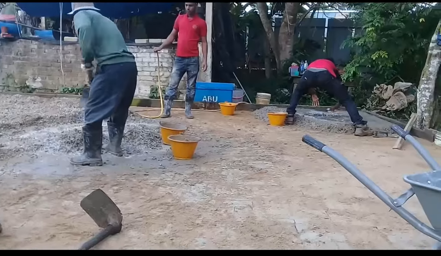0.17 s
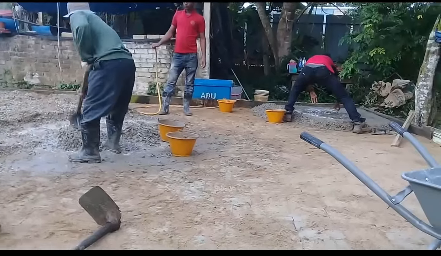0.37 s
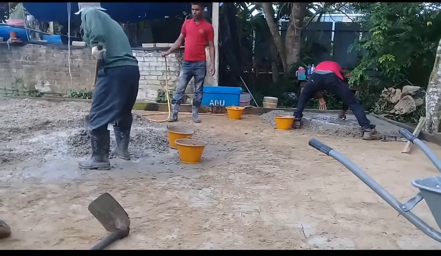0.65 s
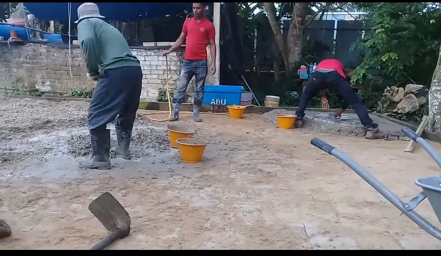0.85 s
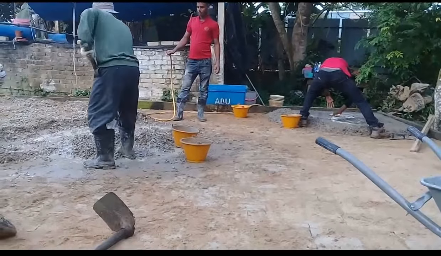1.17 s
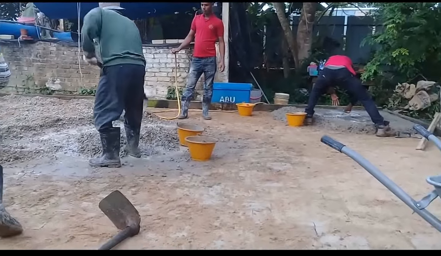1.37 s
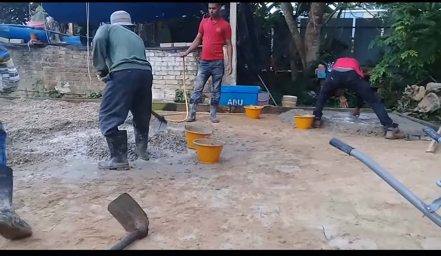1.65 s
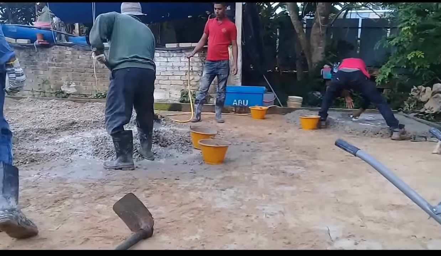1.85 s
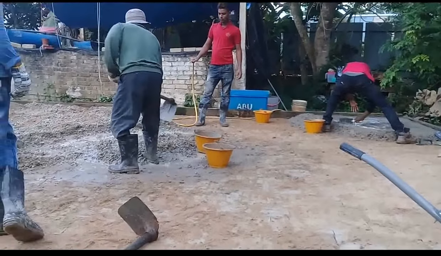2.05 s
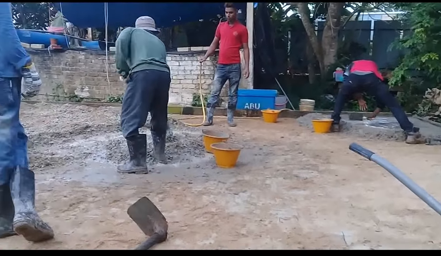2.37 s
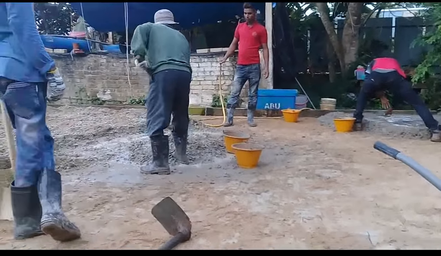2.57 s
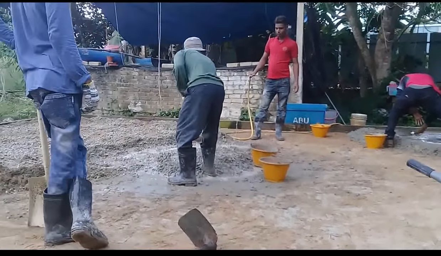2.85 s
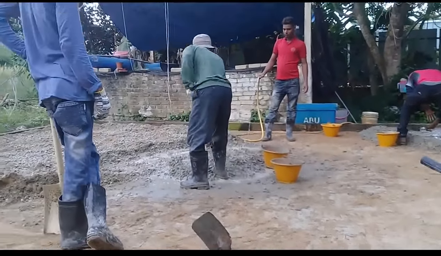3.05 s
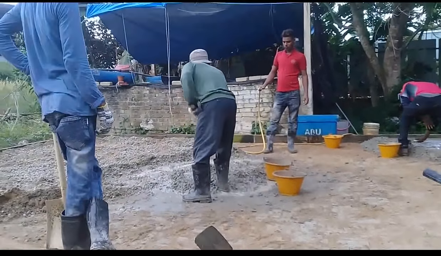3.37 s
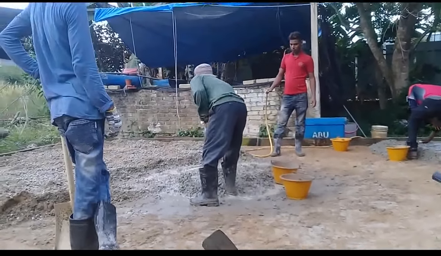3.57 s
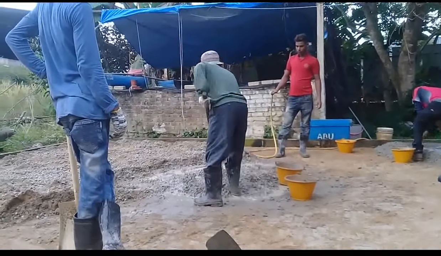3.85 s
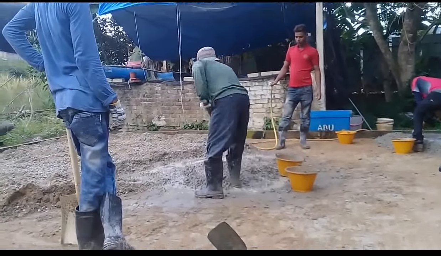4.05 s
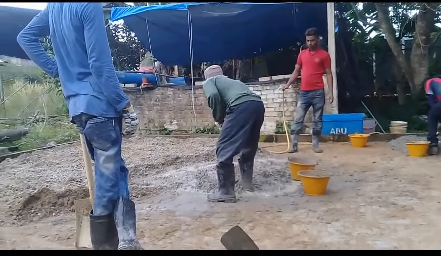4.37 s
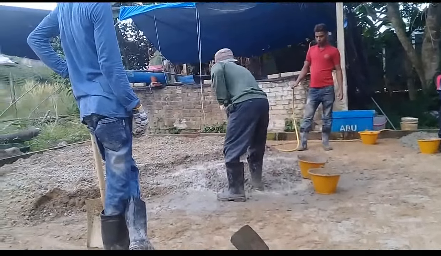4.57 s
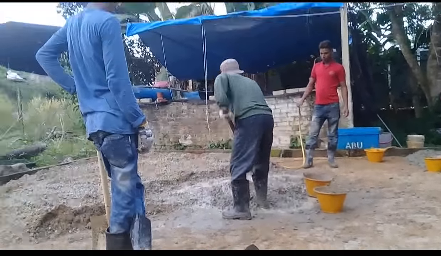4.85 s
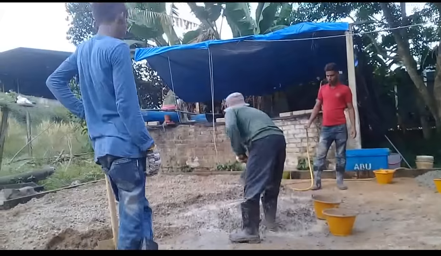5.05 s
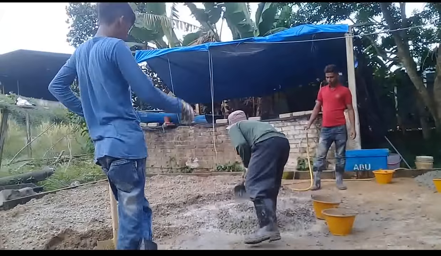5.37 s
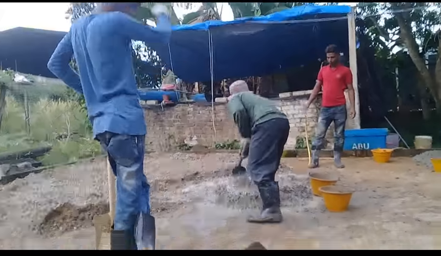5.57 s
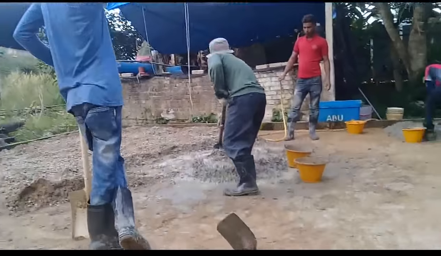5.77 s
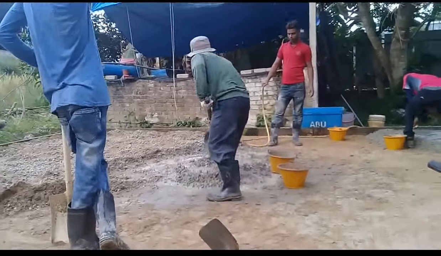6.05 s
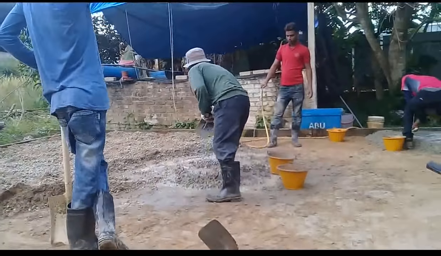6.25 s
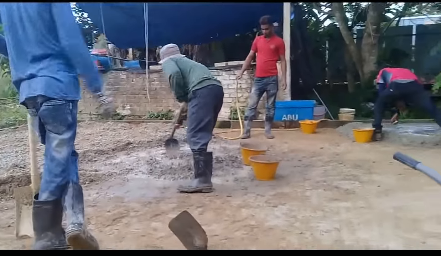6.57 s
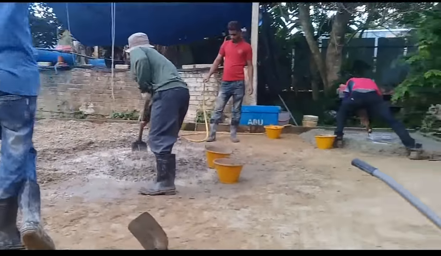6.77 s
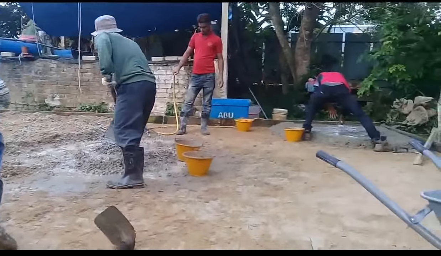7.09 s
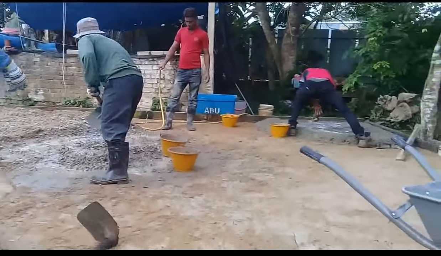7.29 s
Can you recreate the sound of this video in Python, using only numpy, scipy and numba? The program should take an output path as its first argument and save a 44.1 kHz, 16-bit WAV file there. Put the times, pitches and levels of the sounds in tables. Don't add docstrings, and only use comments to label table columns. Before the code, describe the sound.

After a brief silent start, a steel shovel stabs a heap of wet gravel and cement about every two thirds of a second, each bite cracking stones and then grinding. A further blade scrapes and squeals on the slab. Pebbles and grit knock between strokes. Distant engines rumble beyond a walled yard; a phone a few metres away gives a slightly dull top.

```python
import sys
import numpy as np
from scipy import signal
from scipy.fft import rfft, irfft
from scipy.io import wavfile
from scipy.ndimage import uniform_filter1d
from numba import njit

SR = 44100
rng = np.random.default_rng(int(sys.argv[2]) if len(sys.argv) > 2 else 0)


def gain_from_db(level_db):
    decades = np.asarray(level_db, float) / 20
    return 10 ** decades


def generate_wav(signal):
    frames = np.transpose(np.atleast_2d(signal))
    scaled = np.clip(frames, -1, 1) * 32767
    pcm = np.round(scaled).astype(np.int16)
    wavfile.write(sys.argv[1], SR, pcm)


N = 327222
T = np.arange(N) / SR
HZ = np.fft.rfftfreq(N, 1 / SR) + 1e-9


def unit(x):
    return x / np.sqrt(np.mean(x ** 2))


def colour(x, points):
    hz, db = np.transpose(points)
    return irfft(rfft(x) * gain_from_db(np.interp(np.log(HZ), np.log(hz), db)), N)


def band(x, hz, width):
    return signal.lfilter(*signal.iirpeak(hz, hz / width, SR), x)


def walk(rate):
    k = int(SR / rate)
    held = np.repeat(rng.standard_normal(N // k + 1), k)
    return uniform_filter1d(uniform_filter1d(held, k), k)[:N]


def move(t, s, db, rise, hold, fall_db):
    up = np.clip((t - s) / rise, 0, 1)
    return up * up * (3 - 2 * up) * gain_from_db(db - fall_db * np.clip(t - s - rise - hold, 0, None))


@njit
def rings(count, start, hz, t60, size, rate):
    out = np.zeros(count)
    for k in range(len(start)):
        turn = np.exp((2j * np.pi * hz[k] - 6.9 / t60[k]) / rate)
        z = size[k] + 0j
        for i in range(start[k], min(count, start[k] + int(.83 * t60[k] * rate))):
            out[i] += z.imag
            z *= turn
    return out


def ring(s, hz, t60, size):
    s, hz, t60, size = (np.ascontiguousarray(v, float) for v in np.broadcast_arrays(s, hz, t60, size))
    return rings(N, (s * SR).astype(np.int64), hz, np.clip(t60, .003, .5), size, 1. * SR)


def strike(s, hz, t60, size):
    return ring(s, hz, t60, size) - ring(s, hz, .006, size)


def knock(rows, t60_s):
    s, db, hz = np.transpose(rows)
    off = rng.standard_normal((2, len(s)))
    t60 = t60_s * (1500 / hz) ** .6
    first = strike(s, hz, t60, gain_from_db(db - 12.5))
    second = strike(s + 0.0032, hz * (1 + 0.099 * off[0]), 0.5 * t60, gain_from_db(db - 18.5))
    tick = sum(ring(s, tick_hz * (1 + 0.19 * off[1]), 0.0067, gain_from_db(db - 31.0))
               for tick_hz in (2400, 4200, 6600))
    return first + second + tick


# frequency in Hz, level in dB per Hz.
YARD_AIR = [(12, -35.5), (20, 3), (82, 10.5), (108, 8.5), (431, -4.5), (662, -13), (769, -2), (1370, -13.5),
            (1680, 1.5), (2160, -23), (2920, -19.5), (4260, -25.5), (5480, -13.5), (7600, -20), (8200, -27),
            (10700, -64), (18000, -120)]
# time in seconds, level in dB.
TRAFFIC = [
    (1.1, -54.5),
    (4.5, -53),
    (6, -52),
    (7.42, -54),
]
# time in seconds, level in dB.
IDLE = [
    (.25, -69),
    (.4, -50),
    (.62, -46),
    (.7, -50.5),
    (.85, -47.5),
    (1.08, -51.5),
    (1.2, -76),
]


def yard():
    rumble = unit(colour(rng.standard_normal(N), YARD_AIR)) * gain_from_db(-51 + 1.5 * walk(3))
    traffic = unit(band(band(rng.standard_normal(N), 95, 83), 50, 110))
    traffic *= gain_from_db(np.interp(T, *np.transpose(TRAFFIC), -60) - 0.5)
    turn = 2 * np.pi * np.cumsum(76 + 1.5 * walk(4)) / SR
    hum = np.sin(turn) + .5 * np.sin(2 * turn)
    hum *= gain_from_db(np.interp(T, *np.transpose(IDLE)) + 1.7 * walk(10.0))
    return rumble + traffic + hum


# start in seconds, level in dB, hold in seconds, fall in dB per second, note in Hz.
SQUEALS = [
    (0.261, -58, 0.19, 203, 1145),
    (1.962, -45, 0.12, 255, 1535),
    (2.118, -43.5, 0.37, 248, 1481),
    (3.321, -40.5, 0.031, 200, 1506),
    (3.512, -64, 0.064, 249, 1690),
    (4.1915, -35, .009, 2500, 1590),
    (2.87, -55, 0.06, 301, 1494),
    (4.219, -45, 0.2, 243, 1625),
    (4.683, -33, 0.0081, 1497, 1670),
    (5.093, -50, 0.1, 302, 1493),
]


def slab(loose):
    out = np.zeros(N)
    chatter_hz, glide_hz_s = 900, 600
    chatter = band(loose, chatter_hz, 170)
    jerk = gain_from_db(2.5 * walk(150))
    for s, db, hold, fall_db, hz in SQUEALS:
        turn = 2 * np.pi * np.cumsum(hz + glide_hz_s * np.clip(T - s, 0, .3)) / SR
        shifted = chatter * np.cos(turn - 2 * np.pi * chatter_hz * T)
        clean_db = -7 + 13 * (hold < .02)
        note = unit(band(shifted, hz, 450)) + gain_from_db(clean_db) * np.sin(turn)
        out += note * jerk * move(T, s, db, .003, hold, fall_db)
    return out


# start in seconds, peak in dB, pitch in Hz.
LANDINGS = [
    (0.26, -38.5, 318),
    (0.476, -24, 386),
    (1.111, -39, 304),
    (2.459, -25.5, 252),
    (3.042, -36, 189),
    (5.486, -40, 187),
]


def landings():
    s, db, hz = np.transpose(LANDINGS)
    return ring(s, hz, 0.12, gain_from_db(db - 5.5)) + ring(s + 0.006, 2.1 * hz, 0.061, gain_from_db(db - 8.0))


# start in seconds, peak in dB, pitch in Hz.
GRIT = [(1.8138, -18, 6350), (1.9244, -27.5, 6380), (2.0907, -23.5, 6730), (2.124, -28, 6700),
        (2.2199, -29, 6850), (2.2852, -33, 6650), (2.8345, -25, 7630), (2.9588, -34, 6200),
        (3.3376, -25, 6200), (3.345, -24, 6000), (3.3586, -25, 5950), (4.0208, -26.5, 4950),
        (4.059, -26, 5600), (4.133, -32, 5160), (4.1912, -20.5, 5780), (4.802, -29, 5850),
        (5.0025, -22, 6170), (5.5334, -18, 5500), (6.2756, -25, 6170), (7.0234, -25, 7850),
        (7.4114, -18.5, 5200), (7.412, -19, 7700), (7.4125, -21, 1924)]


def clinks():
    s, db, hz = np.transpose(GRIT)
    out = ring(s, hz, .016, gain_from_db(db - 5))
    for lag, shift in ((.002, .93), (.005, 1.06), (.012, .97)):
        out += ring(s + lag, shift * hz, .016, gain_from_db(db - 12 - 500 * lag))
    return out


# start in seconds, peak in dB, pitch in Hz.
PEBBLES = [(0.26, -30.5, 525), (0.808, -16, 1290), (1.256, -8.5, 1720), (1.449, -10, 1290),
           (1.821, -6, 1500), (1.952, -22, 1690), (2.018, -4, 1680), (2.052, -6, 1150), (2.091, -21, 1240),
           (2.142, -9, 1680), (2.223, -14, 1200), (2.249, -11, 1590), (2.312, -12, 1500),
           (2.737, -22, 1650), (3.102, -6.5, 810), (3.967, -14, 1260), (4.454, -9, 1220),
           (4.885, -12, 2480), (5.799, -15, 710), (5.845, -0.5, 3950), (6.363, -25, 5330),
           (6.469, -22, 830), (6.811, -19, 650), (6.889, -12.5, 760), (7.024, -20, 1730)]


def pebbles():
    return knock(PEBBLES, .018)


# start in seconds, peak in
# dB, pitch in Hz.
SNAPS = [(1.0625, -28, 4430), (1.0804, -26, 4340), (1.4513, -25.5, 4350), (1.5, -35, 5460),
         (1.603, -39, 4500), (1.629, -34, 4200), (1.7049, -14, 4290), (2.0902, -45, 6850),
         (2.2195, -39, 6800), (2.2314, -36, 6470), (2.2852, -43, 6610), (2.3489, -14, 3810),
         (2.834, -39, 4300), (2.9585, -29, 6100), (2.9851, -31, 4470), (3.6486, -18, 3880),
         (4.0202, -37, 4300), (4.0512, -34, 4830), (4.0592, -37, 5680), (4.076, -35, 5530),
         (4.133, -37, 5170), (4.3829, -19, 4030), (4.4544, -25, 4000), (4.8017, -24, 4230),
         (6.277, -29, 4330), (6.364, -33, 5170), (6.4074, -37, 5670), (6.551, -25, 4730),
         (6.671, -29.5, 4050),
         (1.9512, -32, 1710), (1.9743, -30, 1390), (1.9944, -28, 1180), (2.0086, -29, 1630),
         (2.0168, -24, 1700), (2.0204, -38, 1380), (2.034, -32, 2460), (2.0489, -32, 1530),
         (2.0522, -23, 1400), (2.057, -24, 1530), (2.074, -38, 1770), (2.0911, -35, 2140),
         (2.106, -25, 1680), (2.1227, -27, 1630), (2.139, -38, 1510), (2.152, -25, 1250),
         (2.161, -34, 1380), (2.1707, -24, 1560), (2.2223, -27, 1500), (2.249, -30, 1490),
         (2.3124, -31, 1490), (2.347, -20, 2080), (2.0190, -30.5, 1300), (2.9605, -19, 1470),
         (4.193, -33, 1570), (6.2772, -35, 2450), (6.467, -40, 1960)]


def snaps():
    s, db, hz = np.transpose(SNAPS)
    dull = hz < 2800
    t60 = .006 * np.where(dull, 2.2, 1)
    spread = np.where(dull, .6, .75)
    size = gain_from_db(db - 6)
    out = np.zeros(N)
    for share in (.6, .82, 1, 1.25):
        note_hz = share ** spread * hz
        out += ring(s, np.minimum(note_hz, 7800), t60, size) - ring(s, note_hz, .003, size * dull)
    return out


# start in seconds, peak in dB,
# pitch in Hz.
JAMS = [(0.494, -16, 1990), (0.595, -19.5, 1200), (0.693, -24, 1710), (1.11, -19, 980),
        (1.117, -18, 1410), (1.439, -20.5, 1270), (1.731, -12.5, 1420), (1.74, -20, 1350),
        (1.764, -23.5, 2080), (3.005, -21, 2110), (3.022, -20, 2170), (3.117, -24, 814),
        (3.165, -31, 1120), (3.698, -27, 1320), (3.72, -21.5, 1200), (3.8, -17.5, 770),
        (4.294, -27, 1690), (4.352, -23.5, 1620), (4.635, -25.5, 750), (4.72, -26, 1600),
        (5.396, -29, 2110), (5.502, -18, 1180), (5.544, -16, 2160), (5.574, -23, 2010),
        (5.598, -16.5, 1150), (5.687, -22.5, 633), (5.88, -22, 1640), (3.785, -22, 781),
        (5.015, -22, 1700), (6.469, -45, 1970), (6.859, -43, 2260),
        (0.4705, -11.5, 3890), (0.5936, -26, 4200), (0.7682, -27, 6120), (0.9383, -38, 4200),
             (1.1029, -15, 4360), (1.4507, -25, 4250), (1.4994, -37, 3630), (1.602, -37, 4290),
             (1.9694, -31, 3880), (2.678, -30, 4130), (3.021, -13.5, 4500), (3.103, -22, 4200),
             (3.7094, -18, 3900), (3.812, -28, 4060), (3.79, -25, 4060), (3.9439, -32, 4040),
             (3.967, -22.5, 4280), (4.0204, -28, 4260), (4.455, -21, 4000), (4.5076, -19, 3940),
             (4.6493, -28, 4220), (4.6818, -29, 4040), (4.7427, -25.5, 4170), (4.7707, -26, 3980),
             (5.3158, -31, 6030), (5.325, -29, 6050), (5.665, -23, 4400), (5.941, -30, 4200),
             (6.024, -29, 4100), (5.398, -18, 3860), (5.4914, -19.5, 4290), (5.5009, -24, 3870),
             (5.5674, -15.5, 3720), (5.7993, -20, 4000), (6.2763, -24.5, 4500), (6.5564, -14, 6380),
             (6.6018, -15, 4340), (6.626, -18, 4020), (6.671, -31, 3910), (6.758, -22, 4060),
             (6.8122, -17.5, 4060), (6.8894, -22, 4080)]


def jams(count=4):
    s, db, hz = np.transpose(JAMS)[:, :, None]
    lag, off, hard = rng.random((3, len(s), count))
    lasts_s, pitch_spread = 0.0087, .09
    when = s + lasts_s * lag * np.arange(count) / count
    pitch = hz * (1 + pitch_spread * (2 * off - 1))
    t60 = .026 * (1500 / hz) ** 0.21
    notes = np.broadcast_arrays(when, pitch, t60, gain_from_db(db - 9 - 4 * hard))
    return ring(*(np.ravel(v) for v in notes))


# frequency in Hz, level in dB, t60 in seconds.
LOADED = [(710, -11, 0.059), (2080, -18.5, 0.099), (3950, -0.5, 0.05), (4800, -8.5, 0.046)]
# start in seconds, level in dB, extra treble in dB.
BITES = [
    (0.4681, -21, -2),
    (.475, -16.5, -2),
    (1.0625, -32, 4),
    (1.728, -16.5, -4),
    (2.348, -23, 4),
    (2.9855, -9, -22),
    (2.994, -32.5, 7),
    (3.6485, -15.5, -4),
    (3.6585, -30.5, 8),
    (4.384, -36, 13),
]


def bites():
    hz, mode_db, t60 = np.transpose(LOADED)
    out = np.zeros(N)
    for s, db, treble_db in BITES:
        off = 1 + .025 * rng.standard_normal(len(hz))
        out += ring(s, hz * off, t60, gain_from_db(db + mode_db + treble_db * (hz > 3000)))
    return out


# start in seconds, peak in dB, pitch in Hz.
NOTES = [
    (1.101, -7, 950),
    (1.704, 8, 4290),
    (2.349, 0.5, 2180),
    (2.859, -15.5, 4230),
    (2.959, -9, 1447),
    (2.985, -1.5, 2180),
    (5.012, -14, 2360),
    (5.037, -17, 2420),
    (5.533, -8.5, 2240),
    (5.599, -7, 4070),
]


def blade_notes():
    return knock(NOTES, .05)


# start in seconds, level in dB, then its modes,
# each a frequency in Hz, level in dB and t60 in seconds.
CLANGS = [
    (1.7045, -23.5, [(710, -17, 0.095), (1400, -13, .1), (2045, 7.5, 0.053), (4100, -6, .08), (5390, 4, 0.051), (7550, -10, 0.083)]),
    (2.834, -41, [(2380, 5, 0.044), (5310, 13, 0.065), (6140, 4, .06), (7900, 6, 0.055)]),
    (4.191, -31.5, [(1660, -2, .12), (2380, -10, .1)]),
    (4.383, -20.5, [(2090, -4, 0.035), (3340, -4, 0.024), (3990, -3, 0.031), (5270, -10.5, .03)]),
    (5.3927, -24, [(1280, -9, 0.018), (2131, 0.5, 0.34), (2230, -13, .12), (760, 5, 0.028), (2550, -5, 0.07), (3946, 7, 0.04), (3698, -10, 0.15), (4264, -6, 0.22), (4479, -5, 0.07), (6885, -17, .14), (5450, -18.5, .2), (6150, -14, 0.28), (6700, -16.5, 0.2)]),
    (2.9585, -37, [(6200, 4, .03), (7400, -3, .03), (4100, -8, .08)]),
    (2.985, -22, [(5350, 6, .035), (3060, -1, .05), (4600, -4.5, 0.05), (2070, -10, .09), (1630, -3, .08)]),
    (6.275, -36, [(2470, -1, 0.051), (4320, 4, 0.037), (1650, 0, 0.062), (7700, -1, .04)]),
    (6.550, -13, [(155, 2, 0.03), (318, -5, 0.043), (640, 1, 0.036), (2120, -18, 0.12), (3090, -7.5, 0.11), (4660, -0.5, 0.026), (3900, -3, 0.04), (520, -2.5, 0.069), (5340, -9.5, 0.11), (6380, -10, 0.1), (7580, -3, 0.038)]),
]
THUD = -36, 170, .04


def clangs():
    free = np.zeros(N)
    for s, level_db, modes in CLANGS:
        hz, db, t60 = np.transpose(modes)
        free += strike(s, hz, np.minimum(t60, .3), gain_from_db(level_db + db))
    db, hz, t60 = THUD
    age = np.clip(T - CLANGS[-1][0], 0, None)
    slap = unit(band(band(rng.standard_normal(N), hz, 100), hz, 200))
    slap *= gain_from_db(db - 60 * age / t60) * (1 - np.exp(-age / 0.003))
    rattle = .5 * np.roll(free, 37) - .4 * np.roll(free, 101)
    return free + rattle + slap


# frequency in Hz, width in Hz, level in dB.
BLADE = [(656, 170, -4.5), (2060, 530, 6.5), (4290, 690, 0.5), (5170, 74, -15.5), (6380, 23, -28.5),
         (7260, 150, -11)]
# frequency in Hz, level in dB per Hz.
GRAVEL = [(120, -10.5), (200, -8.5), (319, -4.5), (470, -12.5), (662, -5.5), (946, -2), (1040, -5.5),
          (1230, 1.5), (1870, -3), (2160, -6), (2810, -9), (4200, 2.5), (4990, -2.5), (7710, 0.5),
          (8200, 1), (10700, -59.5), (18000, -120)]


def stones(count=60000):
    when, pitch, hard, damp = rng.random((4, count))
    size = gain_from_db(np.minimum(-3.5 * np.log(1 - hard), 18))
    clicks = np.bincount((when * N).astype(int), size * np.sign(damp - .5), N)
    pings = ring(when * N / SR, 200 + 8000 * pitch, 0.048 + 0.078 * damp, size)
    drive = unit(clicks) + 0.95 * rng.standard_normal(N)
    steel = sum(gain_from_db(db) * band(drive, hz, 1.4 * width) / np.sqrt(width) for hz, width, db in BLADE)
    loose = colour(unit(drive) + gain_from_db(-2.5) * unit(pings), GRAVEL)
    return loose, steel


EDGES_HZ = 1000, 2800, 5300


def split(x):
    below = [0] + [1 / (1 + (HZ / edge) ** 8) for edge in EDGES_HZ] + [1]
    return [unit(irfft(rfft(x) * np.sqrt(b - a), N)) for a, b in zip(below, below[1:])]


STAB_S = 1.062, 1.7035, 2.347, 2.9845, 3.6475, 5.392, 5.528, 6.548, 7.409
# level in dB, hold in seconds, fall in dB per second, weight of wet mix in dB.
PLUNGES = [
    (-33, 0.082, 138, 3),
    (-22, 0.0026, 92, -6.5),
    (-30, 0.004, 71.5, -1.5),
    (-30, 0.025, 93, -2.5),
    (-31.5, 0.0062, 88, -3.5),
    (-30, 0.0021, 280, -5.5),
    (-35.5, 0.12, 45, -2),
    (-27, 0.0071, 930, -6.5),
    (-42, .02, 100, -8.5),
]
# start in seconds, level in dB, hold in seconds, fall in dB per second, weight in dB.
DRAGS = [(0.454, -27, 0.0029, 120, -2), (0.569, -40, 0.0072, 108, 0.5), (1.09, -42.5, .03, 120, 3),
         (1.18, -46, 0.039, 108, -1), (1.3, -52.5, 0.1, 59.7, -1), (1.48, -61, 0.058, 50, 5),
         (2.44, -61, 0.039, 90, 8), (2.58, -55, 0.16, 50.4, -5.5), (3.076, -40.5, 0.0056, 130, -1),
         (3.7, -40, 0.12, 60, -2), (3.97, -59, 0.027, 80, -14), (4.437, -36.5, 0.12, 168, -0.5),
         (4.63, -42, 0.052, 61.5, 0), (5.467, -37, 0.014, 150, 0), (5.768, -40.5, 0.1, 101.4, -1),
         (5.86, -44, 0.094, 72, -3.5), (6.0, -47.5, 0.042, 110, -7.5), (6.55, -41, 0.15, 60, -4),
         (6.781, -38.5, 0.098, 69.3, -2), (6.96, -44, 0.039, 300, -5), (7.03, -53.5, 0.075, 40, -6)]
# start in seconds, level in dB, hold in seconds, fall in dB per second, brightness in dB.
FAR = [(.24, -50, 0.14, 80, -9.5), (.67, -39.5, 0.075, 79.6, 3.5), (.78, -38.5, 0.17, 40, 4),
       (1.36, -43.5, 0.035, 60, -1.5), (1.415, -43, 0.017, 100, 5), (1.86, -36, 0.15, 60, 3),
       (2.1, -47.5, 0.14, 90, 5), (2.55, -45, 0.26, 70, -3), (3.18, -42, 0.14, 60, 3.5),
       (3.31, -40.5, .05, 90, -3.5), (3.5, -42, 0.24, 60, -2), (3.878, -34, 0.082, 80, -12),
       (5.148, -44, 0.02, 60, 7.5), (5.28, -44, .08, 80, -4.5), (6.39, -50.5, 0.058, 90, 8)]
SKID_S = 2.833, 2.958, 3.335, 4.191, 4.29, 4.382, 4.8, 4.884, 5.001, 5.31, 6.274
# level in dB, hold in seconds, fall in dB per second, fine dust in dB.
SKIDS = [(-50, 0.014, 110, 4), (-49.5, .015, 200, -8), (-58, 0.021, 64, 14), (-45, 0.016, 84, 6),
         (-44, 0.025, 59, -1), (-36.5, 0.004, 52, -8.5), (-43.5, 0.016, 99, 7.5), (-48, 0.021, 52, 3),
         (-45.5, 0.014, 51, -1), (-50.5, 0.07, 31, 3.5), (-46, 0.0069, 140, 10)]
RISE_S = .005, .035, .04, .005
# levels of low, middle, bright and top in dB, then how far
# the move's last column (weight, brightness or dust) lifts each of them [dB per dB].
KINDS = [
    ((0, 0.0044, -7.5, -5.5), (1, 0.01, 0, 0)),
    ((0, 0, -4.5, -9.5), (1, 0.015, -0.62, -1)),
    ((-19, -3.5, -36, -16.5), (1, 0.33, 3.5, 1.5)),
    ((-23.5, 0, -1.4, -5.5), (-1.5, 0.012, 0.48, 0.78)),
]
FALL_SHARE = 0.97, 1.46, 1.15, 1.21
TRICKLE_DB = -66, -58.5, -64.5, -66


def grind(loose, steel):
    t = T[::16]
    power = np.ones((4, len(t))) * gain_from_db(TRICKLE_DB)[:, None] ** 2
    moves = np.c_[STAB_S, PLUNGES], DRAGS, FAR, np.c_[SKID_S, SKIDS]
    for rows, rise, (part_db, lift) in zip(moves, RISE_S, KINDS):
        for s, db, hold, fall_db, colour_db in rows:
            for k, share in enumerate(FALL_SHARE):
                level_db = db + part_db[k] + lift[k] * colour_db
                power[k] += move(t, s, level_db, rise, hold, share * fall_db) ** 2
    lead_s, lead_db = 0.033, -23.5
    for s, (db, *_) in zip(STAB_S, PLUNGES):
        power[1:] += move(t, s - lead_s, db + lead_db, lead_s, 0, 900) ** 2
    jerk = .3 * walk(45) + .55 * walk(220) + 2.2 * walk(700)
    out = np.zeros(N)
    for part, p in zip(split(unit(loose) + gain_from_db(-5) * unit(steel)), power):
        out += part * np.interp(T, t, np.sqrt(p)) * gain_from_db(jerk + 0.71 * walk(30))
    return out


# start in seconds, peak in dB, low share in dB, bright share in dB, ring in dB.
CHOPS = [(0.465, -14.5, 3, 16.5, 4.5), (1.063, 3.5, -23, 9, -32), (1.7036, 5, -23, 10.5, -3),
         (2.3498, 7, -19, 12.5, -27), (2.834, -47, -25, -10, -9), (2.9604, -6, -6, 7, -18),
         (2.9854, 10.5, 1.5, -3, -6), (3.646, -11, 3, -2, 6), (4.193, -14, -23, 12, -8),
         (4.384, 6.5, -2, 1.5, -16), (4.7997, -16, -24, 7.5, 7), (5, -9, -11, -27, 8),
         (5.395, -2, -8.5, 6, -11), (6.271, -2, -12, -8, -16), (6.5525, -35, -25, -1, -23),
         (7.4114, -9, -14, 8, 0.5)]


def chops(loose, steel):
    out = np.zeros(N)
    crack, shiver = split(loose[::-1]), split(steel[::-1])
    for s, db, low_db, bright_db, ring_db in CHOPS:
        age = np.clip(T - s + 0.0011, 0, None)
        bite = 1 - np.exp(-age / 0.0035)
        fade = gain_from_db(-60 * age / 0.019)
        shares = low_db, 0, bright_db, bright_db + 4.0
        for stone, blade, share_db in zip(crack, shiver, shares):
            out += gain_from_db(db + share_db - 31.5) * bite * (stone * fade + gain_from_db(ring_db) * blade * fade ** 0.33)
    return out


def scene():
    background = yard()
    loose, steel = stones()
    hits = landings() + clinks() + pebbles() + snaps() + jams()
    hits += bites() + blade_notes() + clangs() + chops(loose, steel)
    age = T[:SR // 4]
    echo = rng.standard_normal(len(age)) * gain_from_db(-60 * age / 0.13) * (age > .006)
    wet = signal.fftconvolve(hits, echo / np.sqrt(np.sum(echo ** 2)))[:N]
    shovels = slab(loose) + grind(loose, steel) + hits + gain_from_db(-9) * wet
    small = signal.butter(6, 125, "high", fs=SR, output="sos")
    return (background + signal.sosfilt(small, shovels))[None]


def top_cut(x):
    return signal.sosfilt(signal.butter(12, 9380, fs=SR, output="sos"), x)


def record(dry):
    fade = np.clip((T - 0.23) / 0.066 + .5, 0, 1) ** 2
    thin = signal.sosfilt(signal.butter(3, 36, "high", fs=SR, output="sos"), dry * fade)
    cut = signal.sosfilt(signal.ellip(12, .3, 70, 7997, fs=SR, output="sos"), thin)
    return top_cut(cut)


dry = scene()
out = record(dry)
generate_wav(out)
```